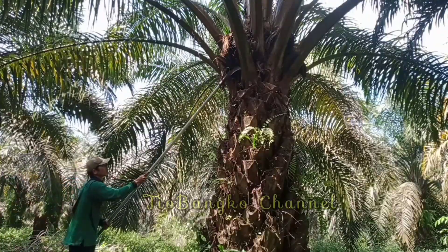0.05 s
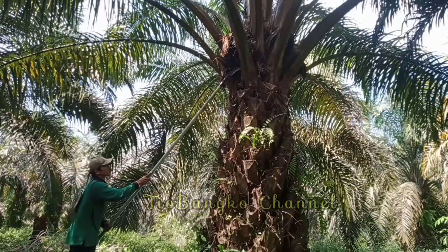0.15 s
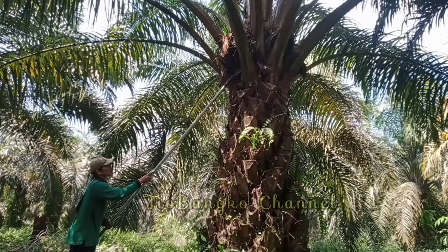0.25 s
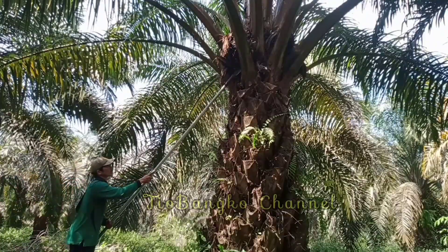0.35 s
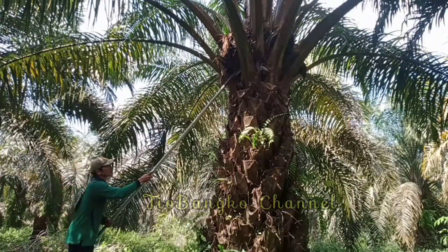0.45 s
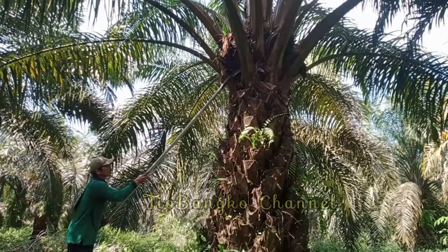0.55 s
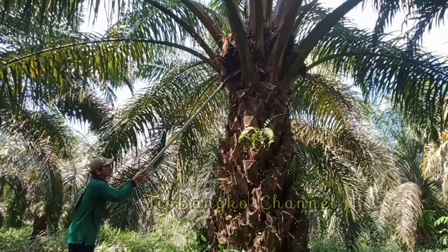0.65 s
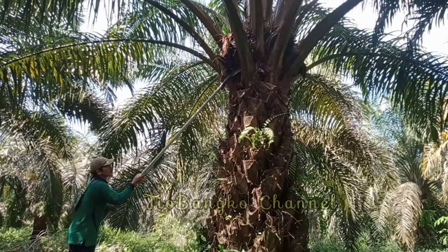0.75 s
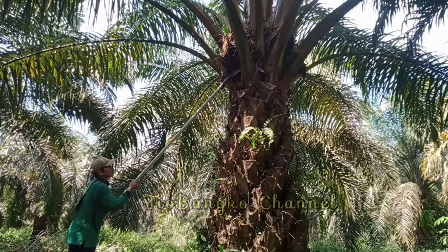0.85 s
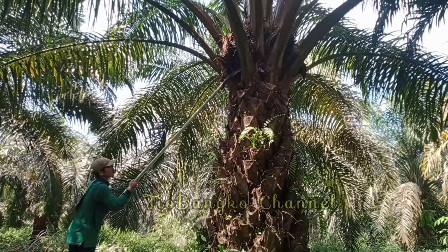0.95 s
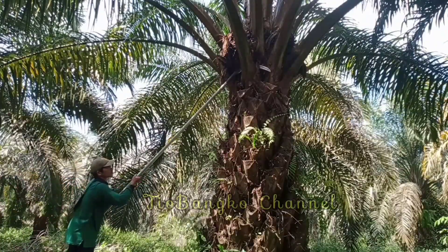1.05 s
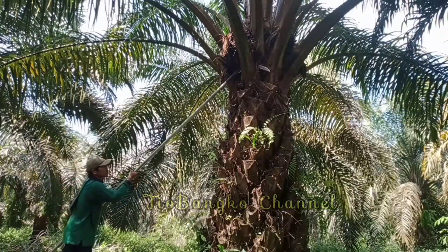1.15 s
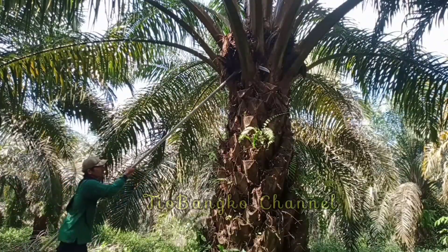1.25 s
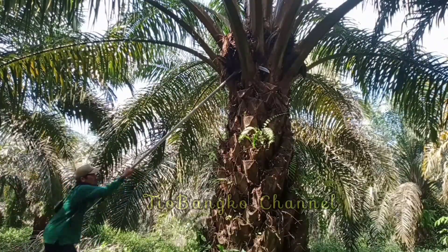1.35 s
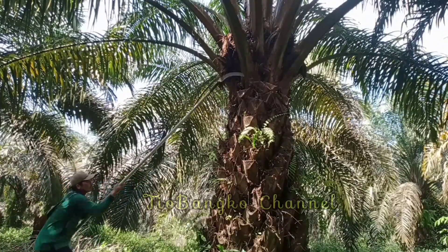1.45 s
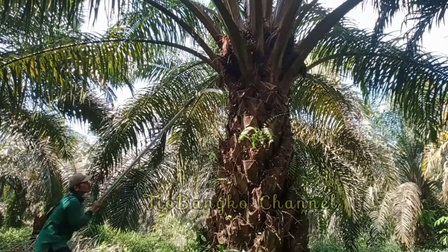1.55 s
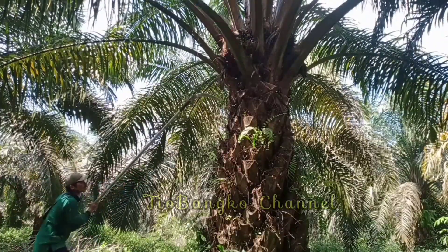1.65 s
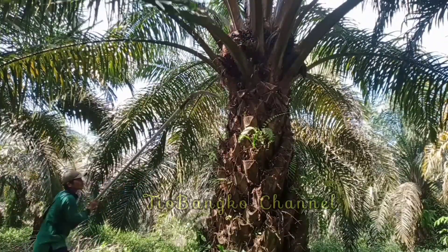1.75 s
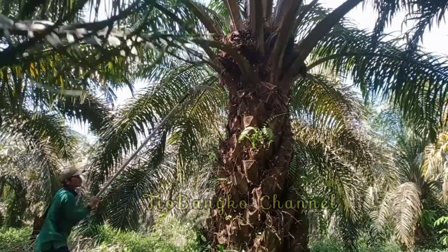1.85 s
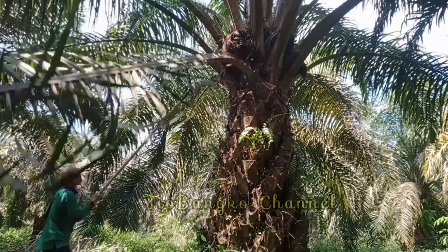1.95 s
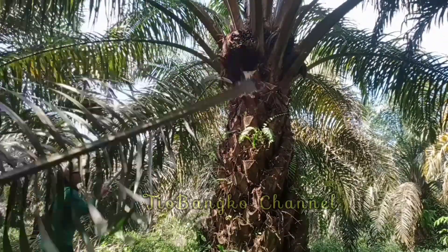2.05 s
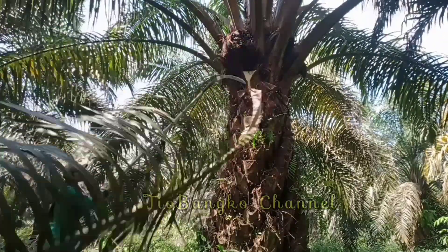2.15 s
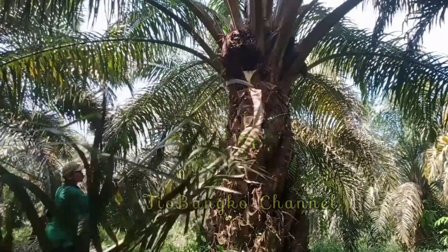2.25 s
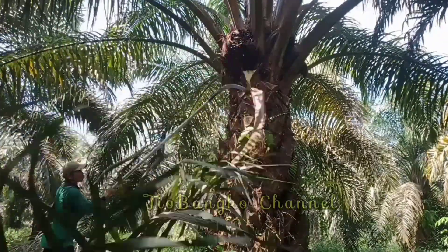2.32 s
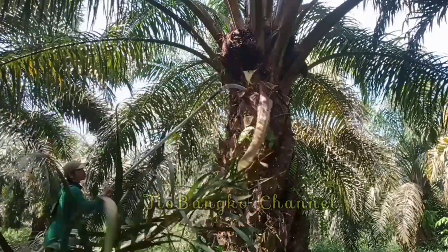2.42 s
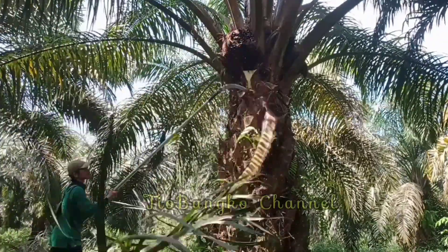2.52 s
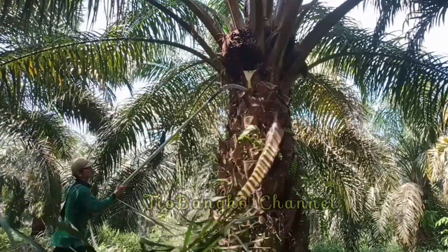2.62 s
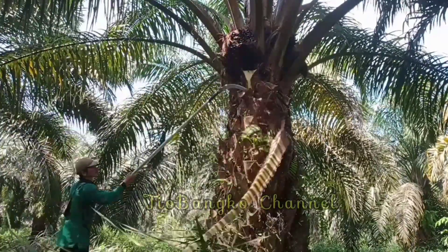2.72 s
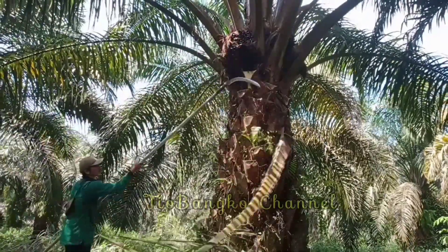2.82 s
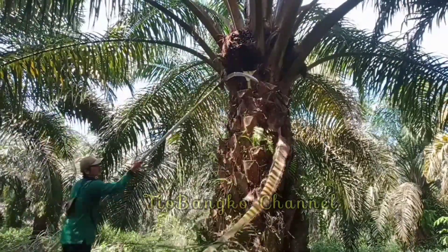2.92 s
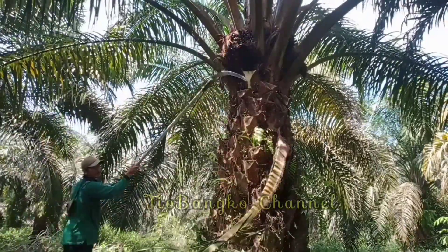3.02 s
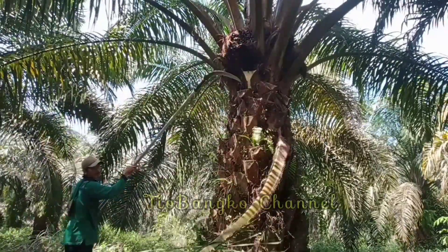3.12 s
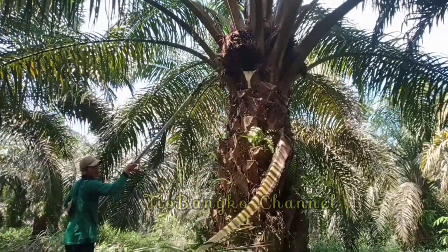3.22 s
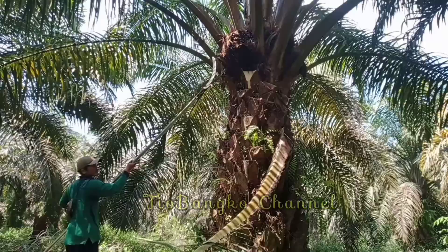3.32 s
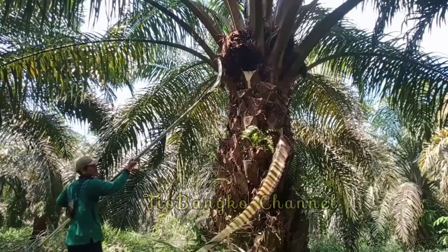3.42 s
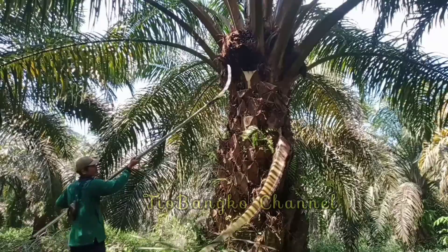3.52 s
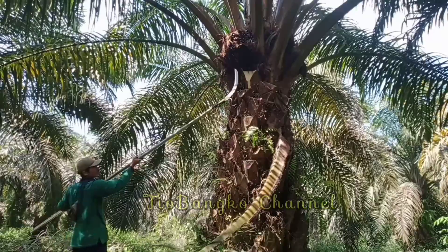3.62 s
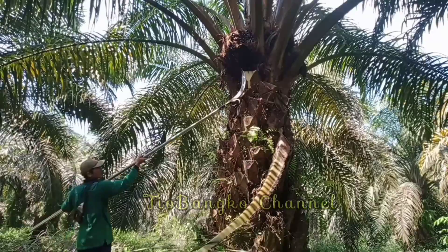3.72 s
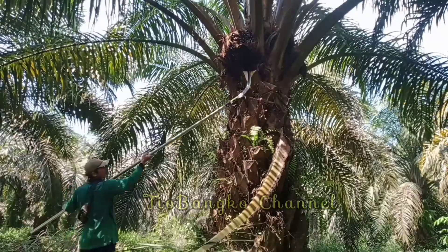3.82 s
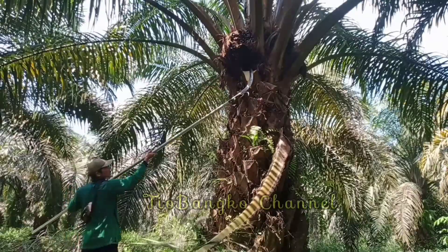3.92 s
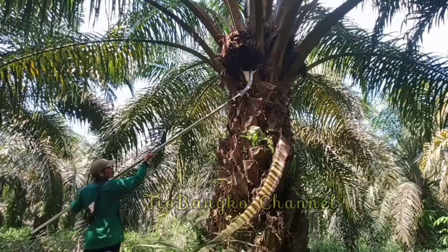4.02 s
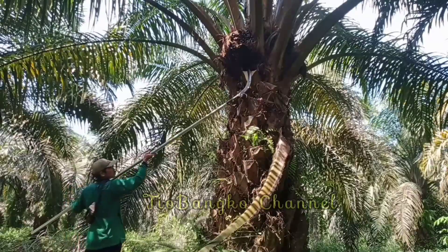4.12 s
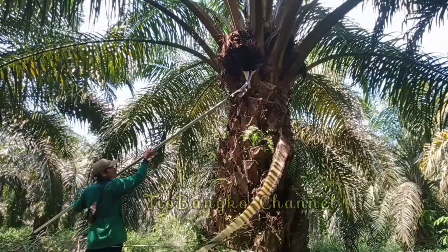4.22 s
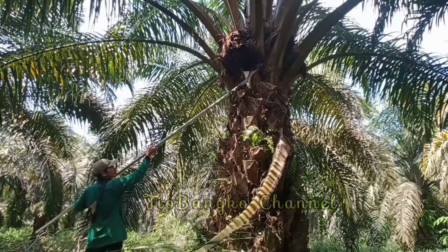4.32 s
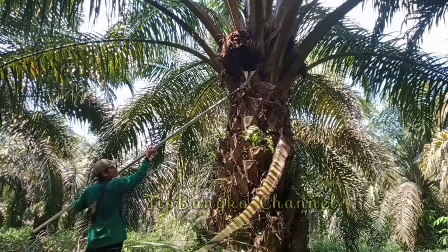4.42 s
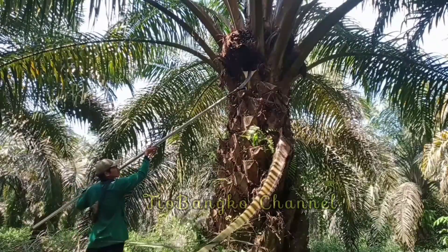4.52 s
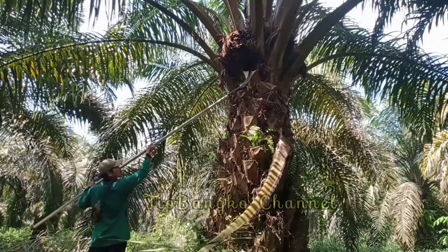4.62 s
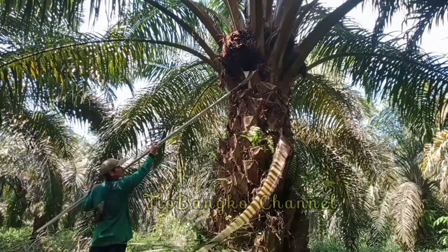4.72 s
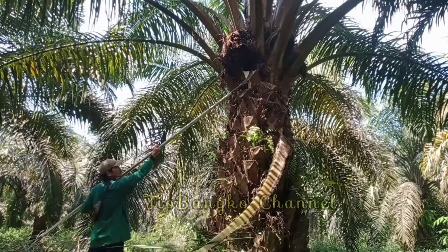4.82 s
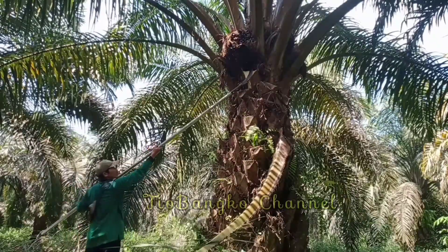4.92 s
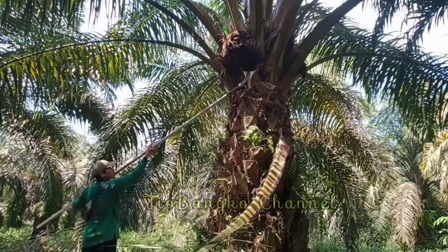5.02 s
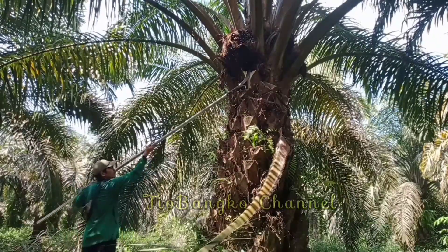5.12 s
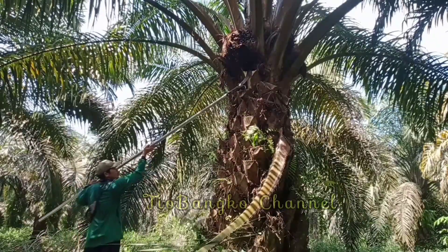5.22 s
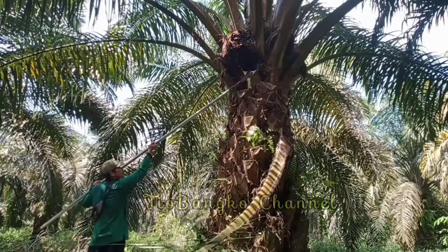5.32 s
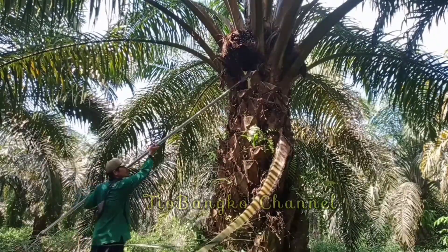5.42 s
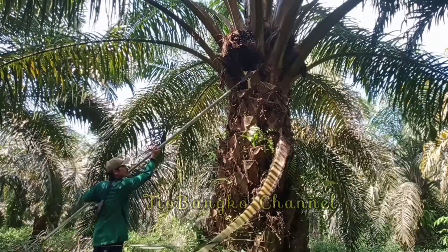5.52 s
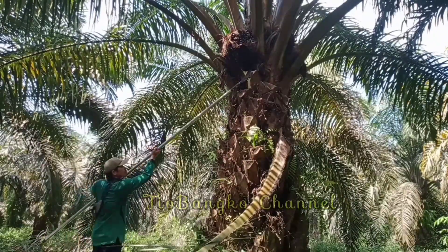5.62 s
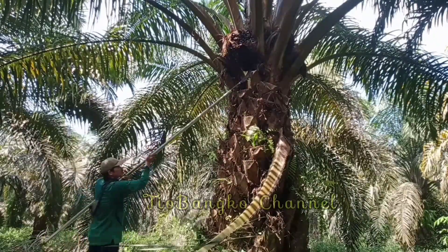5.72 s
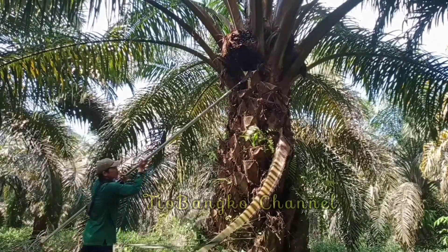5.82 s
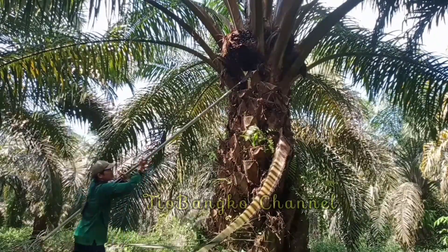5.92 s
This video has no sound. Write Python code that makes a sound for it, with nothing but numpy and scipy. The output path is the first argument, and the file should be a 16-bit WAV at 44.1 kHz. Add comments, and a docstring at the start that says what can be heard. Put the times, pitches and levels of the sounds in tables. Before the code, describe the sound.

A mono outdoor scene in a palm grove, with a very quiet bed of hissing far leaves and thin, shrill insects around 7 kHz. At 0.2, 0.55 and 1.05 s a pole-mounted blade makes faint, short crunches in a stalk, with tiny knocks and squeaks. At about 1.45 s one hard pull tears through: a loud, splintery, woody crunch, by far the sharpest sound. From 1.6 s the frond sweeps down, stiff leaflets brushing and slapping, swelling to 2.3 s over a low stem rumble. Hard woody knocks land at 2.0 and 2.35 s, then in a cluster from 2.6 to 2.85 s. The rustle drops away by 3 s to light leaf ticks. Around 3.9-4.4 s come soft dry scrapes with faint steel ring and snagging clicks. Small fibrous bites follow from 4.3 to 5.5 s, clearest near 4.7, 5.05 and 5.4 s, with faint squeaks and a tick near 5.8 s.

```python
"""Sickle in an oil palm

A sickle on a long pole bites into frond stalks; fibres snap and ring the stalk, and one hard pull tears a frond off.
It sweeps down as brushing, tapping leaflets over a stem rumble, crashes with short woody knocks and settles.
The blade scrapes along the trunk as catch-and-slip clicks, rings faintly, squeaks and bites again.
Coloured noise makes the shrill insects; noise and leaf taps make the far leaves."""
import sys
import numpy as np
from scipy import signal
from scipy.fft import rfft, irfft, next_fast_len
from scipy.io import wavfile

SR = 44100
rng = np.random.default_rng(int(sys.argv[2]) if len(sys.argv) > 2 else 0)


def log_audio(samples):
    """Write samples as a 16-bit WAV file to the path given in sys.argv[1]."""
    # one column per channel
    frames = np.atleast_2d(samples).T
    # limit to full scale, then quantise
    limited = np.clip(frames, -1, 1)
    pcm = np.round(limited * 32767).astype(np.int16)
    wavfile.write(sys.argv[1], SR, pcm)


N = 262836
TIME_S = np.arange(N) / SR

# Pulls through stalk fibres, edge working in, then fibres giving; levels before the trims below:
# t/s, entry/s, give/s, entry re give/dB, crunch/dB, crackle/dB, woody ring/dB, stalk thud/dB, thud f/Hz
PULLS = [(0.214, 0.066, 0.025, -5.5, -52.5, -61, -55.5, -50.5, 356),
         (0.551, 0.027, 0.023, -9, -46, -48, -73, -47, 357),
         (1.042, 0.022, 0.035, -3, -54.5, -76, -60, -58, 370),
         (1.419, 0.033, 0.06, -8.5, -20.5, -33.5, -23, -24.5, 337.7),
         (4.31, 0.0035, 0.011, -7.5, -45, -83, -59.5, -50, 348),
         (4.36, 0.0041, 0.012, -11, -52, -85, -52.5, -59, 380),
         (4.529, 0.0057, 0.016, -21, -54, -83, -58, -59, 443),
         (4.669, 0.024, 0.0098, -5, -42, -69, -43.5, -36.5, 298),
         (5.018, 0.0262, 0.014, -6, -40, -54, -43, -47.5, 347),
         (5.325, 0.0016, 0.0097, -21, -55.5, -77, -53, -54, 332),
         (5.36, 0.016, 0.0086, -8.5, -40.5, -62, -41.5, -39, 285),
         (5.44, 0.0061, 0.065, 7.5, -59, -76, -68, -59.5, 307),
         (5.845, 0.0042, 0.043, 4, -66, -82, -70, -64, 269)]
# Hard contacts of blade, pole and falling frond; levels before the trims:
# t/s, ring time/s, crack/dB, body/dB, body f/Hz
CONTACTS = [(0.247, 0.015, -62, -54, 780), (0.578, 0.0073, -51, -46, 433), (1.046, 0.044, -63, -52.5, 345),
            (0.705, 0.015, -58.5, -48, 1020), (1.588, 0.0028, -39, -35, 1190),
            (2.022, 0.0031, -43, -28, 3270), (2.341, 0.018, -27, -30, 716), (2.608, 0.011, -40, -33.5, 406),
            (2.63, 0.0087, -38.5, -23, 680), (2.651, 0.011, -64, -24, 510),
            (2.677, 0.04, -37.5, -36.5, 605), (2.756, 0.0081, -34.5, -32.5, 705),
            (2.826, 0.011, -30, -31, 670), (3.243, 0.0087, -68, -48, 1080),
            (3.324, 0.007, -60, -42.5, 1060), (3.899, 0.0068, -57.5, -57, 1570),
            (3.988, 0.031, -63, -52, 367), (4.512, 0.013, -40.5, -67, 1030),
            (5.823, 0.019, -48.5, -52, 1226)]
# Blade sliding over dry leaf bases until it snags; levels before the trims:
# t/s, rasp/dB, steel ring/dB, snag crunch/dB, snag thud/dB
SLIDES = [(3.92, -51.5, -63, -48.5, -64.5), (4.058, -49.5, -50, -51, -62), (4.225, -51, -59, -52, -53),
          (4.393, -53.5, -63, -56, -57)]
# Thin squeaks of the blade in the stalk: t/s, length/s, f/Hz, width/Hz, level/dB
BLADE_SQUEAKS = [(0.245, 0.0072, 1070, 80, -51.5), (0.55, 0.012, 1210, 83, -52),
                 (5.771, 0.026, 4070, 608, -51), (5.851, 0.0065, 2710, 160, -50)]
# Soft, dull bumps: t/s, length/s, f/Hz, level/dB
SOFT_BUMPS = [(0.313, 0.012, 112, -71), (3.756, 0.082, 80, -64)]
# Frond sweeping down, then settling on the ground; levels before the trims:
# t/s, leaflets/dB, heavy stem/dB
FROND_SWEEP = [(1.575, -36.5, -51), (1.839, -38, -49.5), (2.001, -30.5, -37.5), (2.127, -37.5, -50.5),
               (2.251, -32.5, -44.5), (2.317, -25, -38.5), (2.351, -30, -34.5), (2.413, -37.5, -49),
               (2.589, -41, -50.5), (2.613, -34, -38.5), (2.629, -35, -45), (2.743, -37, -42.5),
               (2.757, -35, -45), (2.81, -45, -45)]
FROND_SETTLE = [(2.87, -38.5, -44), (3.176, -54, -70.5), (3.34, -52, -72.5), (3.366, -54.5, -67),
                (3.652, -57, -92), (3.72, -76, -78)]

# Resonances of stalk and pole, of the stalk cut off, of the next stalk, and weaker ones of the steel:
# f/Hz, width/Hz, level/dB
STALK_POLE_MODES = [(1060, 40, 5.5), (1233, 21, 13), (1328, 96, -2.5), (1480, 35, 10), (1700, 120, -0.5),
                    (1750, 31, -15), (2108, 28, 5.5), (2340, 30, -22), (2640, 22, -6.5), (3220, 55, -7),
                    (4040, 150, 1.5), (4960, 50, -11.5)]
CUT_STALK_MODES = [(520, 44, -7.5), (537, 61, 2.5), (631, 43, 1), (770, 35, 2.5), (846, 14, -11.5)]
NEXT_STALK_MODES = [(634, 114, -6.5), (752, 140, -0.5), (1020, 39, -7)]
STEEL_MODES = [(1260, 34, 6.5), (2950, 18, 10.5), (3550, 23, 2), (3570, 25, 6), (3900, 56, 5),
               (6240, 41, -13), (8360, 130, -5.5)]

# Spectral colours of the materials, relative: f/Hz, level/dB
FIBRE_COLOUR = [(300, -15.5), (700, 2.5), (1000, -0.5), (2000, -0.5), (3000, -2.5), (4000, -3.5),
                (5500, -16), (8000, -21.5), (10000, -37)]
CRACKLE_COLOUR = [(2000, -32), (4000, 20), (6000, -2), (8500, 5.5), (9800, -19), (12000, -12), (15500, -8)]
CRACK_COLOUR = [(300, -7), (1000, 12), (2200, 7), (4000, 6.5), (5500, -9.5), (8000, -10.5), (10000, -25),
                (15500, -47)]
RASP_COLOUR = [(250, -27), (450, 2.5), (750, -27.5), (1300, 9), (2500, 6), (3800, 3.5), (5500, 1.5),
               (7500, -3), (8700, -6), (10000, -16), (15500, -24)]
LEAFLET_COLOUR = [(200, -33), (450, -8.5), (700, -1), (1100, -1), (1600, -1.5), (2700, -0.5), (3800, -5.5),
                  (5200, -13.5), (6500, -19), (8500, -20), (10000, -32.5), (12500, -41), (15500, -34)]
STEM_COLOUR = [(25, -34.5), (45, -25), (70, -3), (130, 3), (220, 2), (380, 5), (550, 6), (900, -32)]
GROVE_COLOUR = [(25, -32.5), (70, -1), (140, -1), (300, -13), (700, -6.5), (950, -6), (1400, 0.5),
                (2700, 2.5), (4000, -1.5), (5500, -14), (8000, -19), (10000, -35), (15500, -22.5)]
INSECT_COLOUR = [(4500, -27.5), (6200, -23.5), (6700, -10), (7100, -5), (7350, -0.5), (7600, -14.5),
                 (8000, -21), (8500, -21.5), (9500, -35), (13000, -45), (14200, -27), (15000, -25),
                 (15800, -24)]

NEXT_STALK_S = 3.8
ENTRY_HZ, FLEX_HZ = 424, 244   # stiffest before it gives, then bends as a whole
ENTRY_THUD_DB, ENTRY_WOOD_DB = -1.5, -9   # re stalk thud plus entry level
FLEX_DB, FLEX_DB_PER_S = -16.5, 142   # re mean of thud and crunch; a long pull bends it further
WEIGHT_DB = -19.5   # re the same mean
TEAR_OUT_SHARE = 0.49   # fade of the last fibres, as a share of the give
CRUNCH_TRIM_DB, CRACKLE_TRIM_DB, WOOD_TRIM_DB = 0.215, -1.5, -0.5   # during the give
CRACK_TRIM_DB, BODY_TRIM_DB = 0.29, -0.6
RECOIL_S, RECOIL_DB, RECOIL_PITCH = 0.015, -22.5, 0.441   # delay; level and pitch re body
SLIDE_S, SNAG_S, SNAG_HZ = 0.0415, 0.018, 389
SNAG_CRACKLE_DB, SNAG_WOOD_DB = -6, 0   # re snag crunch, re snag thud
BLADE_HZ = 2227
RASP_TRIM_DB, STEEL_TRIM_DB = -0.8, -4.0
LEAFLETS_TRIM_DB, STEM_TRIM_DB = -1.2, 0.3
AT_REST_S, TIPS_HZ = 3.06, 480   # from here the rustle is light leaf tips only
GROVE_DB, INSECTS_DB = -65.5, -63.5   # far leaves before sway and drift; insects
STIRRED_DB, STIRRED_FROM_S, CALMING_DB_PER_S = -63.5, 1.6, 0.7   # crown swaying on
SWAY_S, SWAY_DB = 0.717, 2.0   # steady swell and ebb: period, peak
EARLY_T60_S, GROVE_T60_S = 0.12, 0.23
CUTOFF_HZ = 15700


def bites():
    """The edge works in, then fibres part in a dense run of snaps that shakes the stalk and rings its resonances."""
    fibres = snaps(per_s=2800, spread_db=0.5) * from_db(2.0 * drift(250))
    stalk_ring = rms_one(ringing(fibres, STALK_POLE_MODES))
    crunch = rms_one(coloured(fibres, FIBRE_COLOUR) + from_db(-5.0) * stalk_ring)
    uneven = from_db(2.2 * drift(400) + 1.5 * drift(70))
    crackle = coloured(fibres * uneven, CRACKLE_COLOUR)
    cut_wood = ringing(fibres, CUT_STALK_MODES)
    next_wood = ringing(fibres, NEXT_STALK_MODES)
    wood = np.where(TIME_S < NEXT_STALK_S, cut_wood, next_wood)
    weight = rms_one(resonance(resonance(fibres, 105, 130), 96, 200))
    stiff = resonance(resonance(fibres, ENTRY_HZ, 95), ENTRY_HZ, 520)
    out = np.zeros(N)
    for row in list(PULLS) + snags():
        start, entry_s, give_s, entry_db, crunch_db, crackle_db, wood_db, thud_db, thud_hz = row
        entry = stroke(start, entry_s, rise=0.0025, fade=0.0035)
        bite_in = from_db(crunch_db) * crunch + from_db(crackle_db) * crackle
        out += from_db(entry_db) * entry * bite_in
        entry_thud_db = thud_db + entry_db
        out += at_level(stiff * entry, start, entry_s + 0.0043, entry_thud_db + ENTRY_THUD_DB)
        out += at_level(wood * entry, start, entry_s + 0.003, entry_thud_db + ENTRY_WOOD_DB)

        give = start + entry_s
        pull = stroke(give, give_s, rise=0.13 * give_s, fade=TEAR_OUT_SHARE * give_s)
        sway = stroke(give, give_s, rise=0.003, fade=0.0036)
        thud = resonance(resonance(fibres * sway, thud_hz, 55), thud_hz, 570)
        flex = resonance(resonance(fibres * pull, FLEX_HZ, 110), FLEX_HZ, 480)   # lower bending mode
        mean_db = (thud_db + crunch_db) / 2
        out += at_level(crunch * pull, give, give_s, crunch_db + CRUNCH_TRIM_DB)
        out += from_db(crackle_db + CRACKLE_TRIM_DB) * crackle * pull
        out += at_level(wood * sway, give, give_s, wood_db + WOOD_TRIM_DB)
        out += at_level(thud, give, give_s, thud_db)
        out += at_level(flex, give, give_s, mean_db + FLEX_DB + FLEX_DB_PER_S * give_s)
        heave = stroke(give + 0.012, give_s, rise=0.0082, fade=0.034)
        out += from_db(mean_db + WEIGHT_DB) * weight * heave
    return out


def snags():
    """Every slide ends in a shallow bite, with the edge already in the fibre."""
    return [(s + SLIDE_S - 0.004, 0.004, SNAG_S, -8, crunch_db, crunch_db + SNAG_CRACKLE_DB,
             thud_db + SNAG_WOOD_DB, thud_db, SNAG_HZ)
            for s, _, _, crunch_db, thud_db in SLIDES]


def knocks():
    """A splintering crack and a short woody ring at the pitch of what is hit, then a softer, lower recoil."""
    contact = snaps(per_s=7400, spread_db=1.5)
    crack = coloured(contact, CRACK_COLOUR)
    out = np.zeros(N)
    for s, ring_s, crack_db, body_db, body_hz in CONTACTS:
        blow = stroke(s, 0, rise=0.00032, fade=0.38 * ring_s)
        force = contact * blow
        force[int(s * SR)] += 4   # extra push at first touch
        width_hz = 1.26 / ring_s   # a long ring is a narrow one
        body = resonance(resonance(force, body_hz, width_hz), body_hz, 8.2 * width_hz)
        out += at_level(crack * blow, s, ring_s, crack_db + CRACK_TRIM_DB)
        out += at_level(body, s, ring_s, body_db + BODY_TRIM_DB)
        swing = contact * stroke(s + RECOIL_S, 0, rise=0.016, fade=0.011)
        recoil_hz = RECOIL_PITCH * body_hz
        recoil = resonance(resonance(swing, recoil_hz, 140), recoil_hz, 450)
        out += at_level(recoil, s + RECOIL_S, 0.054, body_db + RECOIL_DB)
    return out


def scrapes():
    """The blade catches and slips on dry fibre, and the steel rings faintly."""
    slips = snaps(per_s=2800, spread_db=-0.5) * from_db(5.1 * drift(180))
    steel = rms_one(ringing(slips, STEEL_MODES))
    rasp = rms_one(coloured(slips, RASP_COLOUR) + from_db(-0.5) * steel)
    out = np.zeros(N)
    for s, rasp_db, ring_db, _, _ in SLIDES:
        slide = stroke(s, SLIDE_S, rise=0.014, fade=0.011)
        out += at_level(rasp * slide, s, SLIDE_S, rasp_db + RASP_TRIM_DB)
        ring = resonance(resonance(slips * slide, BLADE_HZ, 25), BLADE_HZ, 200)
        out += at_level(ring, s, SLIDE_S, ring_db + STEEL_TRIM_DB)
    return out


def squeaks():
    """Narrow bands of noise: tones whose phase wanders, so that wide ones sound hoarse."""
    out = np.zeros(N)
    for s, length_s, hz, width_hz, db in BLADE_SQUEAKS:
        tone = resonance(resonance(rng.standard_normal(N), hz, width_hz), hz, 3 * width_hz)
        out += at_level(tone * stroke(s, length_s, rise=0.0078, fade=0.003), s, length_s, db)
    return out


def falling_frond():
    """Stiff leaflets brush and slap past each other, a few tick; the heavy stem rumbles beneath them."""
    leaflets, stem = gains(np.vstack([FROND_SWEEP, FROND_SETTLE]))
    brush = rms_one(rng.standard_normal(N) + from_db(-3.5) * snaps(per_s=3000, spread_db=-4))
    taps = leaf_taps(per_s=3500, spread_db=2.5, sharpness=30)
    ticks = leaf_taps(per_s=220, spread_db=2.2, sharpness=5)
    contacts = brush + from_db(-9.5) * taps + from_db(-7.5) * ticks
    rustle = coloured(contacts, LEAFLET_COLOUR) * from_db(1.1 * drift(90))
    tips = signal.sosfilt(signal.butter(3, TIPS_HZ, "high", fs=SR, output="sos"), rustle)
    rustle = np.where(TIME_S < AT_REST_S, rustle, tips)
    rumble = coloured(snaps(per_s=1000, spread_db=4.5), STEM_COLOUR)
    return from_db(LEAFLETS_TRIM_DB) * leaflets * rustle + from_db(STEM_TRIM_DB) * stem * rumble


def leaf_taps(per_s, spread_db, sharpness):
    """Each tap briefly rings a leaflet at one of 24 pitches, dealt by chance; rms 1."""
    taps = snaps(per_s, spread_db)
    dealt = rng.integers(0, 24, N)
    pitches_hz = np.geomspace(550, 7000, 24)
    return rms_one(sum((-1) ** k * resonance(taps * (dealt == k), hz, hz / sharpness)
                       for k, hz in enumerate(pitches_hz)))


def low_bumps():
    """Soft, dull bumps: short pushes of noise through a low resonance."""
    air = rng.standard_normal(N)
    out = np.zeros(N)
    for s, length_s, hz, db in SOFT_BUMPS:
        push = air * stroke(s, length_s, rise=0.015, fade=0.0099)
        out += at_level(resonance(resonance(push, hz, 46), hz, 69), s, length_s, db)
    return out


def grove():
    """Far leaves hiss and tick, the shaken crown calms slowly, and an insect chorus shrills."""
    stirring = rng.standard_normal(N) + from_db(-8.0) * leaf_taps(per_s=1100, spread_db=3.5, sharpness=25)
    insects = coloured(rng.standard_normal(N), INSECT_COLOUR) * from_db(1.1 * drift(56))
    since_s = TIME_S - STIRRED_FROM_S
    crown = (since_s > 0) * from_db(STIRRED_DB - CALMING_DB_PER_S * since_s)
    sway_db = SWAY_DB * np.cos(2 * np.pi * TIME_S / SWAY_S) + 0.5 * drift(6.1)
    breeze = np.hypot(from_db(GROVE_DB), crown) * from_db(sway_db)
    return breeze * coloured(stirring, GROVE_COLOUR) + from_db(INSECTS_DB) * insects


def echoes(x, early_db, late_db):
    """Scatter from the near trunks and ground, then a faint tail from the grove; both dulled."""
    t = TIME_S[:SR]
    decay = from_db(early_db - 60 * t / EARLY_T60_S) + from_db(late_db - 60 * t / GROVE_T60_S)
    response = rng.standard_normal(SR) * decay * (t > 0.008)
    scattered = signal.fftconvolve(x, response)[:N]
    return signal.sosfilt(signal.butter(1, 4000, fs=SR, output="sos"), scattered)


def stroke(start, length, rise, fade):
    """Pressure builds, holds for the length of the stroke and dies away."""
    t = TIME_S - start
    build = np.clip(t / rise + 0.5, 0, 1)
    return build * np.exp(-np.clip((t - length) / fade, 0, 50))


def at_level(x, start, length, db):
    """Scale a sound so that its rms during the stroke is this level."""
    held = x[int(start * SR):int((start + length) * SR) + 2]
    return x * from_db(db) / np.sqrt(np.mean(held ** 2) + 1e-20)


def snaps(per_s, spread_db):
    """Clicks at random times, of random size and sign; rms 1."""
    sizes = from_db(spread_db * np.minimum(rng.exponential(1, N), 4)) * rng.choice([-1, 1], N)
    return rms_one(sizes * (rng.random(N) < per_s / SR))


def resonance(x, hz, width):
    """Two-pole resonance, about unit gain at its peak."""
    r = np.exp(-np.pi * width / SR)
    zeros = np.array([1, 0, -1]) * (1 - r * r) / 2
    poles = [1, -2 * r * np.cos(2 * np.pi * hz / SR), r * r]
    return signal.lfilter(zeros, poles, x + 1e-18)


def ringing(x, modes):
    """Resonances in parallel, with alternating signs."""
    return sum(from_db(db) * (-1) ** k * resonance(x, hz, width)
               for k, (hz, width, db) in enumerate(modes))


def coloured(x, spectrum):
    """Causal (minimum-phase) filter with the given spectrum; rms 1."""
    size = 2 * next_fast_len(N // 2 + 4096)
    hz, db = np.transpose(spectrum)
    bins_hz = np.arange(size // 2 + 1) * SR / size
    log_gain = np.log(from_db(np.interp(np.log(bins_hz + 1), np.log(hz), db)))
    cepstrum = irfft(log_gain)[:size // 2]   # causal half
    response = np.exp(rfft(2 * cepstrum, size))
    return rms_one(irfft(rfft(x, size) * response)[:N])


def drift(rate):
    """Slow chance: normal random knots, rate per second, joined by lines."""
    knots = rng.standard_normal(4000)
    return np.interp(TIME_S * rate, np.arange(len(knots)), knots)


def gains(rows):
    """The dB columns of a curve as gains over time, at -100 dB outside its span."""
    s, *columns = np.transpose(rows)
    knots_s = np.r_[s[0] - 0.03, s, s[-1] + 0.2]
    return [from_db(np.interp(TIME_S, knots_s, np.r_[-100, c, -100])) for c in columns]


def rms_one(x):
    """Scale to unit power."""
    return x / np.sqrt(np.mean(x ** 2) + 1e-20)


def from_db(db):
    """Decibels to gain."""
    return 10 ** (np.asarray(db) / 20)


def scene():
    """Blade, pole and knocks with their echoes, over the frond, bumps and grove; one channel."""
    work = bites() + knocks() + scrapes() + squeaks()
    work_echoes = echoes(work, early_db=-32.5, late_db=-53)
    return (work + work_echoes + falling_frond() + low_bumps() + grove())[None]


def record(dry):
    """Steep low-pass: the top is cut."""
    return signal.sosfilt(signal.ellip(10, 0.1, 70, CUTOFF_HZ, fs=SR, output="sos"), dry)


dry = scene()
out = record(dry)
log_audio(out)
```